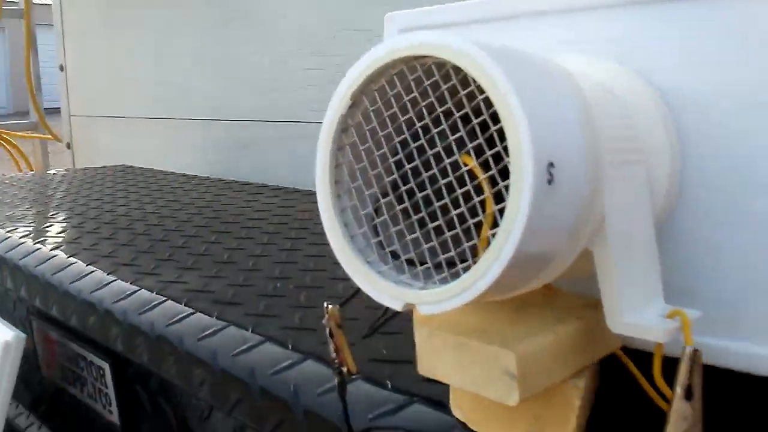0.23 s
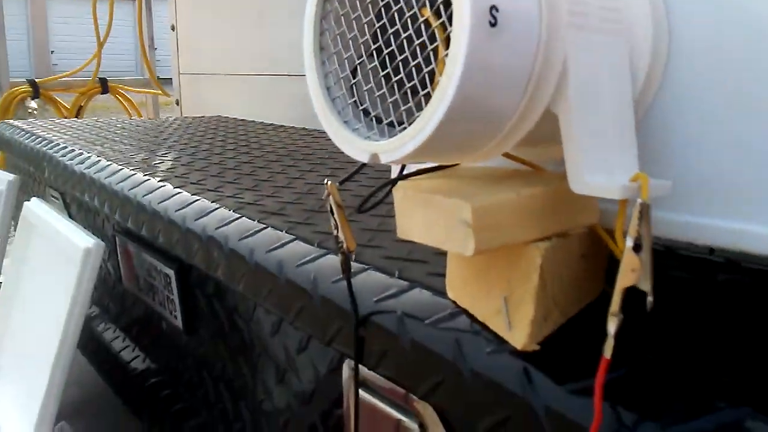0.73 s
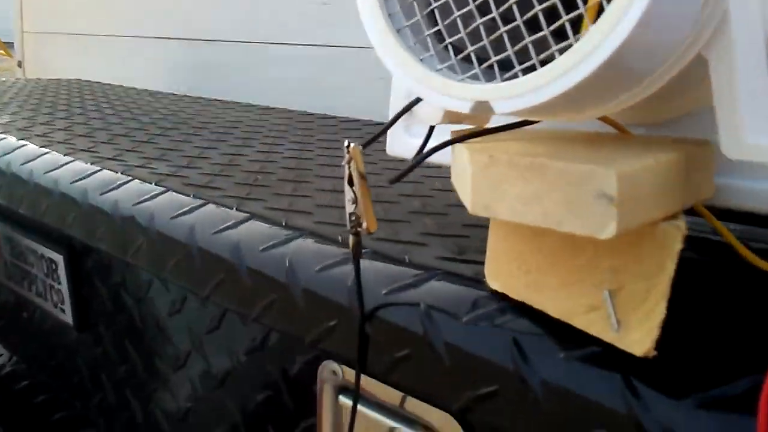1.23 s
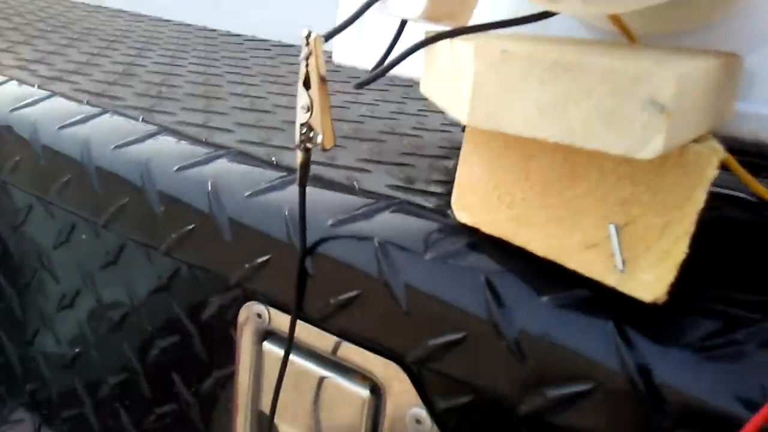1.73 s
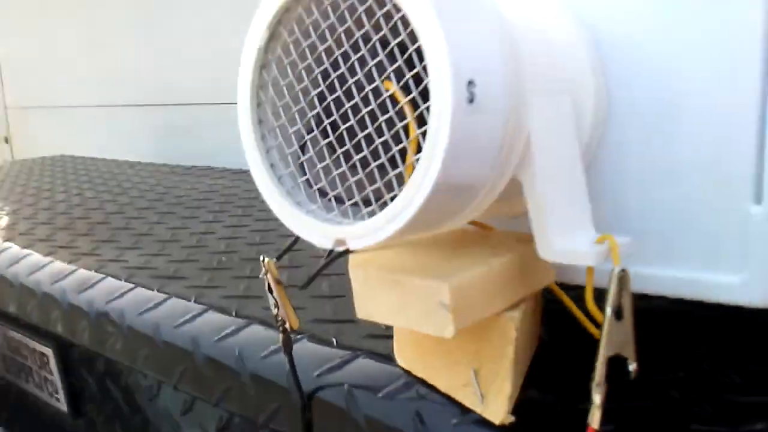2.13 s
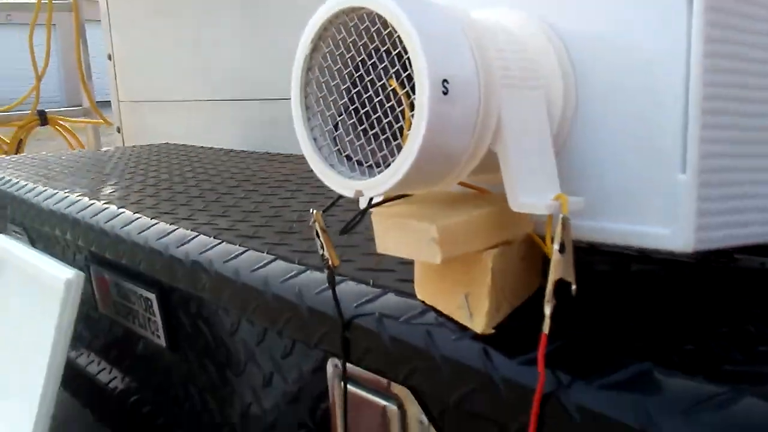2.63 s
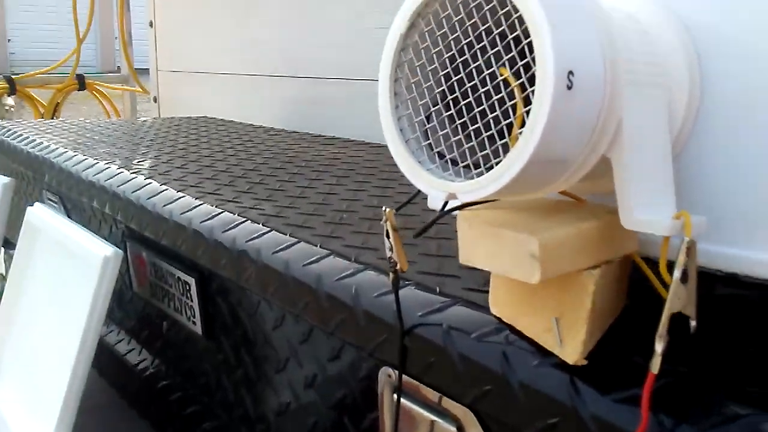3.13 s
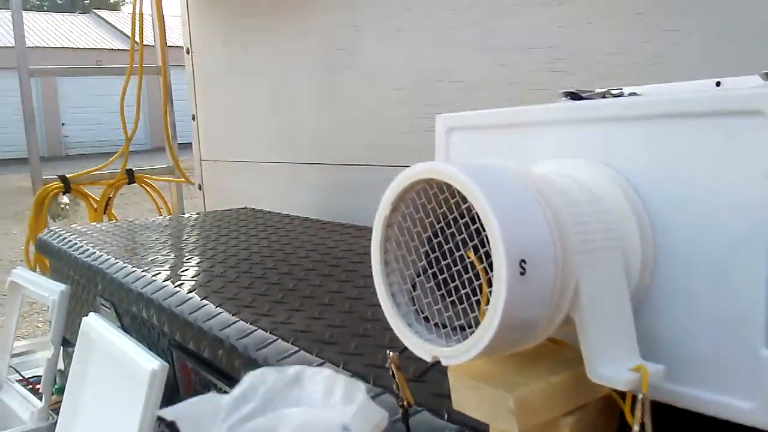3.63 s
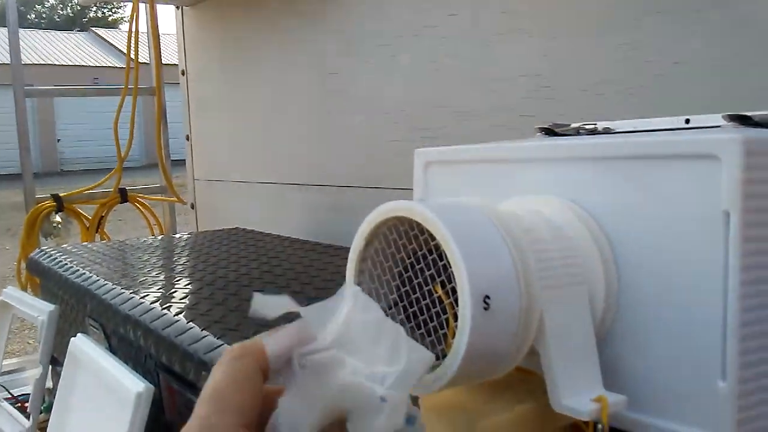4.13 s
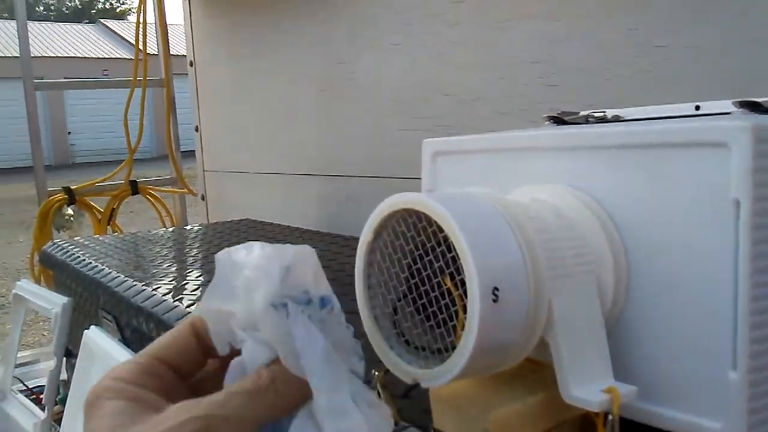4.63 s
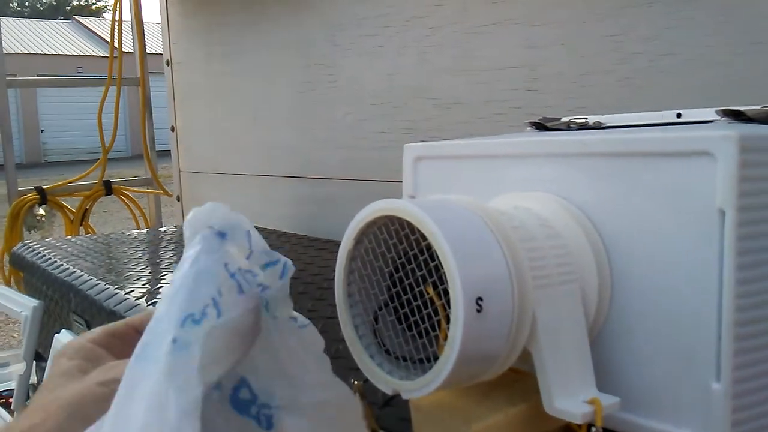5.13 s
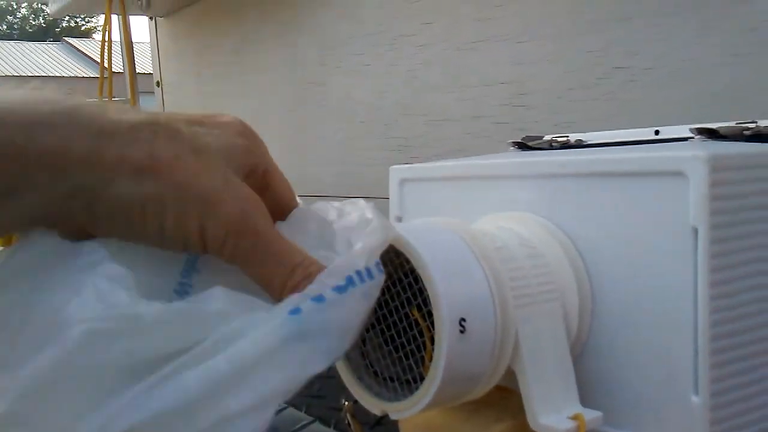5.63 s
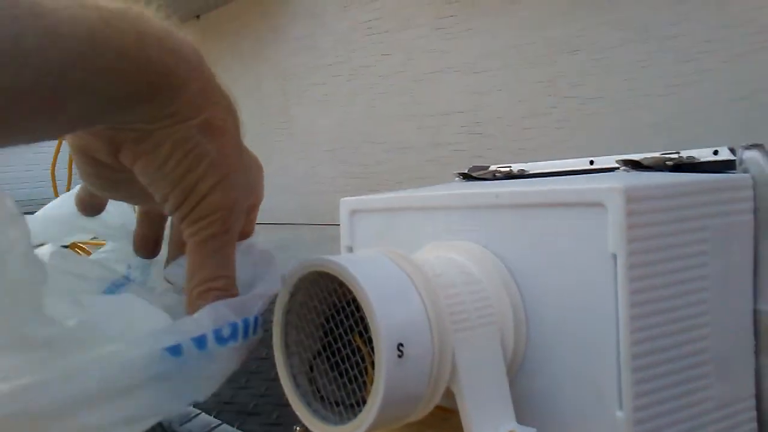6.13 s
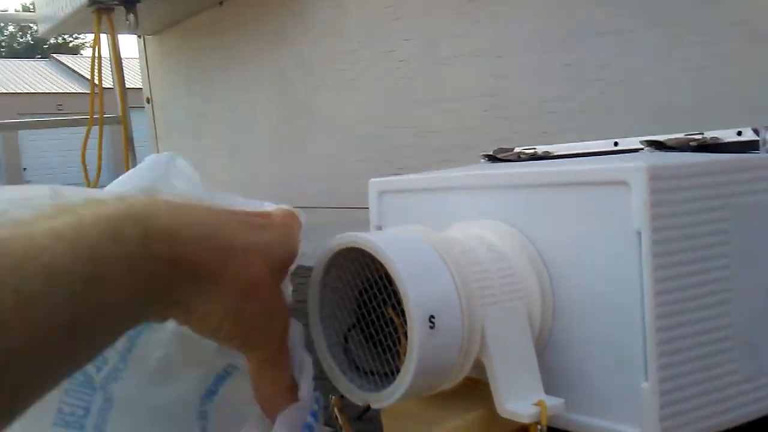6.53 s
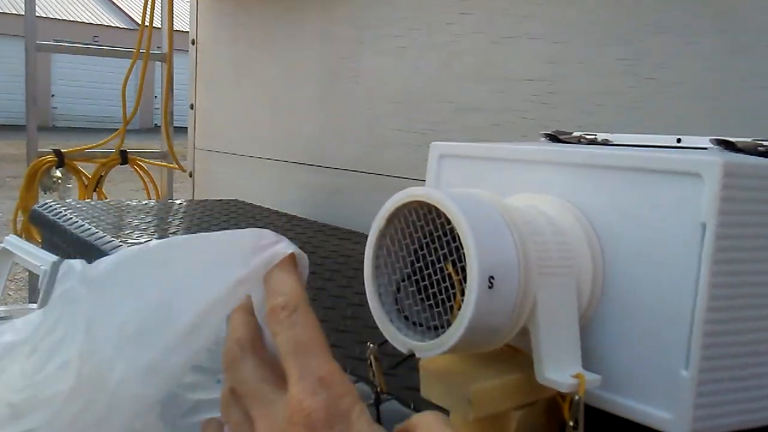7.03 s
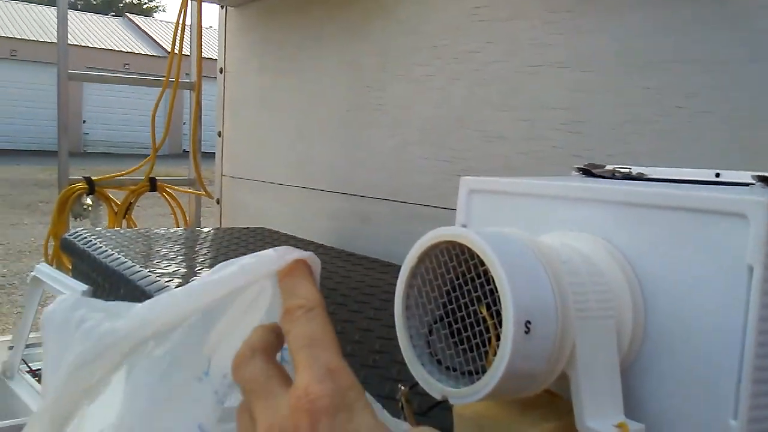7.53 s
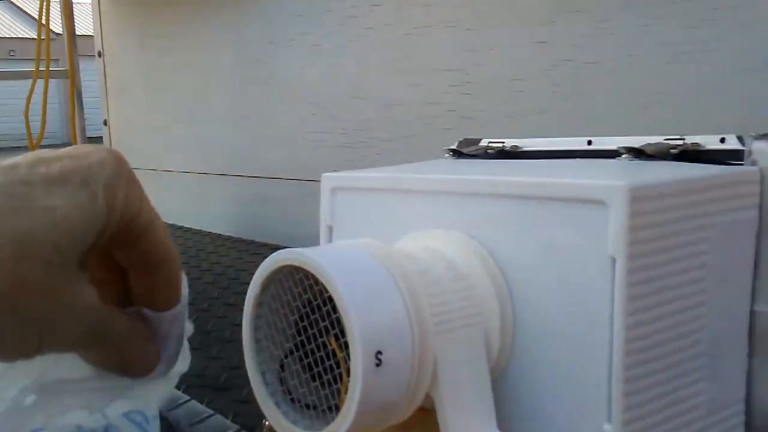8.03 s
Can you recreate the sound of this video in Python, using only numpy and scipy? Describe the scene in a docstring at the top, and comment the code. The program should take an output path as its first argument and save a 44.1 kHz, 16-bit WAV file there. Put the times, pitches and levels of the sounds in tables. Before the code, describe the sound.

Steady high whine, low motor hum and hollow rushing air come from a duct fan at close range. As the microphone wanders past the grille, the tone wavers and the hiss brightens, then dulls. Halfway through, thin film crinkles in sharp little snaps, followed by fluttery low gusts on the microphone and soft rustling to the end, with a barely audible far engine drone underneath.

```python
"""Close in front of a small electric duct fan, a hand-held microphone wanders about the grille.
The steadily running rotor whines on multiples of its shaft rate: sines locked to one count of turns.
Rushing air, made of coloured noise, rings the short housing, roars at its mouth and hisses in the mesh.
A thin plastic bag rustles in the stream as showers of tiny clicks, and gusts bump the microphone.
Far away engines drone on their lowest firing tones."""
import sys
import numpy as np
from scipy import signal
from scipy.fft import rfft, irfft, next_fast_len
from scipy.io import wavfile
from scipy.ndimage import uniform_filter1d

SR = 44100
rng = np.random.default_rng(int(sys.argv[2]) if len(sys.argv) > 2 else 0)


def transcribe(signal):
    """Save signal, clipped to [-1, 1], as a 16-bit WAV file at the path in sys.argv[1]."""
    frames = np.atleast_2d(signal).T
    limited = np.clip(frames, -1, 1)
    pcm = np.round(limited * 32767).astype(np.int16)
    wavfile.write(sys.argv[1], SR, pcm)


N = 366030


def undb(db):
    """Decibels to amplitude gain."""
    return 10 ** (np.asarray(db) / 20)


def unit(x):
    """Scale to rms 1."""
    return x / np.sqrt(np.mean(x ** 2))


def curves(table):
    """The columns of a timed table, drawn as straight lines with one value a sample."""
    s, *columns = np.transpose(table)
    return [np.interp(np.arange(N) / SR, s, c) for c in columns]


def colour(x, points, resonances=()):
    """Filter by an outline of frequency_hz and gain_db, with resonant humps on top."""
    size = next_fast_len(N + SR)
    f = np.maximum(np.arange(size // 2 + 1) * SR / size, 1)
    hz, db = np.transpose(points)
    shape = np.interp(np.log(f), np.log(hz), db)
    for centre, width, lift in resonances:
        shape = shape + lift / (1 + (2 * (f - centre) / width) ** 2)
    return irfft(rfft(x, size) * undb(shape), size)[:N]


def noise(points, resonances=()):
    """Coloured noise of rms 1."""
    return unit(colour(rng.standard_normal(N), points, resonances))


def walk(rate):
    """Smooth chance of rms 1, taking a new direction rate times a second."""
    place = np.arange(N) / SR * rate
    knots = rng.standard_normal(N // 20)
    path = np.interp(place, np.arange(len(knots)), knots)
    return unit(uniform_filter1d(path, int(SR / rate / 2)))


def tone(turns, db):
    """A sine on a running count of cycles, at an rms level and a random phase."""
    return np.sqrt(2) * undb(db) * np.sin(2 * np.pi * (turns + rng.random()))


def puffs(table):
    """Bell-shaped swells at the given times, half-lengths (to 1/e squared) and peak levels."""
    t = np.arange(N) / SR
    return sum(undb(db) * np.exp(-2 * ((t - s) / length) ** 2) for s, length, db in table)


def rotor(rush_db, hiss_db, flutter=0.000504, whine_gain_db=2.15, beat_gains_db=(0, 0, -1),
          wander_db=2.0, shimmer_db=0.68, overtone_shimmer_db=2.14, usual_rush_db=-24.5,
          closeness=0.9, whistle_wander_db=1.0, scatter_db=-45):
    """All lines are locked to one shaft, whose speed flutters by a small share."""
    # pitch of the blade whine: start_s, pitch_hz
    speed = [(0.0, 1917), (1.88, 1915), (2.42, 1914), (2.93, 1911), (3.84, 1917), (4.56, 1921),
             (4.95, 1911), (6.67, 1921), (8.29, 1914)]
    # whine as the microphone crosses its reflections: start_s, level_db before whine_gain_db
    whine = [(0.0, -24.5), (0.16, -22), (0.58, -31), (1.04, -23), (1.27, -25), (1.34, -32), (1.64, -28),
             (1.87, -32), (2.01, -25), (2.36, -25), (2.7, -31.5), (3.03, -24), (3.56, -25), (3.81, -33),
             (4.32, -29.5), (4.6, -37), (4.69, -29), (5.06, -26.5), (5.59, -30.5), (5.89, -44), (6.68, -33),
             (6.84, -25), (7.79, -26.5), (7.93, -38), (8.02, -27), (8.3, -29.5)]
    # overtones of the five-per-turn beat, each with its own sound field:
    # start_s, then order_5_db, order_10_db, order_20_db before beat_gains_db
    beat = [(0.0, -30.5, -39.5, -34), (0.65, -35.5, -31, -46), (1.1, -38.5, -37.5, -33.5),
            (1.95, -30.5, -36, -29), (2.3, -38.5, -34.5, -44), (2.95, -44, -42, -45),
            (3.6, -34.5, -35.5, -34), (4.8, -36, -36, -38), (6.0, -37.5, -34, -35.5),
            (6.6, -38.5, -38, -37), (7.7, -39.5, -38, -32), (8.0, -34, -39, -34), (8.3, -41, -34, -41)]
    # weaker rotor and motor lines: shaft_multiple, level_db at the usual distance
    hum = [(1, -58), (2, -52.5), (3, -36), (6, -45.5), (9, -51), (12, -54), (14, -64), (17, -58), (18, -49),
           (23, -49), (25, -42.5), (28, -47), (29, -60), (30, -50)]
    # faint high lines that ride on the hiss: shaft_multiple, level_db against hiss_db
    sing = [(35, -14), (50, -31), (70, -27)]
    # thin whistles beaming out of the grille:
    # shaft_multiple, level_db on the axis, beaming in dB per dB of hiss
    whistles = [(40, -36, 3.5), (55, -39.5, 1.5)]
    whine_order, on_axis_hiss_db = 15, -31.5

    whine_hz, = curves(speed)
    shaft_hz = whine_hz / whine_order * (1 + flutter * walk(25.1))
    turns = np.cumsum(shaft_hz) / SR
    whine_level_db = curves(whine)[0] + whine_gain_db + shimmer_db * walk(50)
    out = tone(whine_order * turns, whine_level_db)
    # eddies scatter a little of the whine, so it wavers where it is weak
    out += tone(whine_order * turns, scatter_db) * walk(30)
    for order, db, gain_db in zip((5, 10, 20), curves(beat), beat_gains_db):
        out += tone(order * turns, db + gain_db + overtone_shimmer_db * walk(20))
    # the hum grows with the rush as the microphone comes close
    near_db = closeness * (uniform_filter1d(rush_db, SR) - usual_rush_db)
    for order, db in hum:
        # shorter waves change more as the microphone moves
        order_wander_db = wander_db * min(order / whine_order, 1)
        out += tone(round(order) * turns, db + near_db + order_wander_db * walk(4))
    for order, db in sing:
        out += tone(round(order) * turns, hiss_db + db + wander_db * walk(3))
    # narrow beams: off the axis the whistles fade faster than the hiss
    for order, db, beaming in whistles:
        beam_db = db + beaming * (hiss_db - on_axis_hiss_db)
        out += tone(round(order) * turns, beam_db + whistle_wander_db * walk(8.8))
    return out


def airflow(rush_db, mouth_db, hiss_db, rush_gain_db=1, mouth_gain_db=-.5, hiss_gain_db=1.5,
            eddy_db=0.67, core_gain_db=11, beaming=1.59, core_share=0.3, usual_mouth_db=-28):
    """Turbulence rings the housing, roars at its mouth and hisses in the mesh, shaken by eddies."""
    # spectral outlines, from the housing to the bright core of the hiss:
    # frequency_hz, relative_density_db
    rush_outline = [(30, -26), (65, -13), (120, -23.5), (170, -6.5), (280, -5), (550, -1.5), (900, -2),
                    (1400, -2.5), (1750, 1.5), (2050, 4.5), (2600, 3), (3200, 4), (4000, -0.5), (6000, -45)]
    mouth_outline = [(1000, -26), (2800, -18.5), (3350, -8), (3600, 3.5), (3850, 3), (4020, 3.5),
                     (4800, -15), (6500, -39)]
    hiss_outline = [(3000, -27), (4500, 2), (6400, -0.5), (7200, -0.5), (8200, -2), (9100, -13),
                    (10000, -13.5), (11000, -21.5), (12500, -30), (15700, -36)]
    core_outline = [(6500, -29), (8100, 2), (9200, 0.5), (10200, -26), (12000, -42)]
    # air resonances of the housing: centre_hz, width_hz, lift_db
    duct = [(1063, 70, 5), (1128, 145, 9.5), (1540, 64, 1), (2170, 81, 9.5), (2294, 78, 5.5),
            (2814, 105, 5.5)]

    rush = noise(rush_outline, duct) * undb(rush_db + rush_gain_db + eddy_db * walk(20))
    mouth = noise(mouth_outline) * undb(mouth_db + mouth_gain_db + eddy_db * walk(50))
    hiss = noise(hiss_outline) * undb(hiss_db + hiss_gain_db + eddy_db * walk(40))
    # the core is a narrow beam, so it falls away faster off the axis
    # and it grows with the roar as the microphone faces the mouth
    facing_mouth_db = core_share * (mouth_db - usual_mouth_db)
    core = noise(core_outline) * undb(beaming * hiss_db + core_gain_db + facing_mouth_db)
    return rush + mouth + hiss + core


def bag(grains_per_s=12000, spread_db=3.5, flap_db=2.0, bag_gain_db=5.5,
        crease_decay_s=0.0034, crease_gain_db=6):
    """Countless tiny buckles of film; sharp creases add short, differently coloured showers of them."""
    # sharp creases snapping: peak_s, level_db before crease_gain_db
    creases = [(3.739, -50), (3.764, -47), (3.789, -50), (3.815, -47), (3.912, -43), (3.934, -39),
               (3.952, -39), (3.995, -46), (4.04, -47), (4.081, -48), (7.39, -47)]
    # the bag lifted in front of the microphone: start_s, sizzle level_db against the crinkle
    facing = [(3.55, -18), (3.76, -3), (7.5, 0), (7.62, -14), (7.8, 0), (8.3, -9)]
    # outlines of film crinkle, its finest crackle and a snapping crease:
    # frequency_hz, relative_density_db
    film = [(2000, -20), (6500, 12), (8500, 11), (10000, 3.5), (12000, 1), (13200, -1), (14500, -1.5),
            (15700, -3.5)]
    sizzle = [(9000, -28), (12000, -15), (13300, -3), (14600, 2), (15700, 3)]
    snap = [(3000, -10), (7500, 7), (10000, -10), (12000, -15), (14000, 0), (15700, 1)]

    sizes = undb(spread_db * np.minimum(rng.exponential(size=N), 5)) * rng.choice([-1, 1], N)
    buckles = sizes * (rng.random(N) < grains_per_s / SR)
    effort = handling() * undb(bag_gain_db + flap_db * walk(90))
    t = np.arange(N) / SR
    showers = sum(undb(db + crease_gain_db) * np.exp(-np.abs(t - s) / crease_decay_s)
                  for s, db in creases)
    crackle = unit(colour(buckles, sizzle)) * undb(curves(facing)[0])
    crinkle = unit(colour(buckles, film)) + crackle
    return crinkle * effort + unit(colour(buckles, snap)) * showers


def handling():
    """As fingers shift their grip, each rustle swells and dies more slowly, over a faint constant stirring."""
    # peak_s, half_length_s before the rise and fall shares, level_db before the bag's gain
    rustles = [(1.77, .15, -49), (2.05, .05, -45), (2.3, 0.15, -45), (2.647, 0.14, -45), (3.07, 0.075, -45),
               (3.2, .05, -51), (3.38, .1, -47), (3.79, .08, -56), (3.99, .11, -51), (4.3, 0.074, -65),
               (4.68, 0.078, -52), (4.9, 0.22, -59), (5.22, .17, -52.5), (5.47, 0.13, -51),
               (5.83, 0.2, -56), (6.52, 0.16, -60), (7.4, .04, -54), (7.817, .08, -55), (8.08, 0.19, -50),
               (8.26, 0.1, -40.5)]
    rise_share, fall_share = 1, 1.4
    t = np.arange(N) / SR
    # the film stirs in the stream between rustles
    power = undb(-63.5) ** 2
    for s, length, db in rustles:
        width = length * np.where(t < s, rise_share, fall_share)
        power = power + (undb(db) * np.exp(-2 * ((t - s) / width) ** 2)) ** 2
    return np.sqrt(power)


def gusts():
    """Air turned aside by the bag thumps on the microphone; the moving hand adds deeper bumps."""
    # gusts, then soft bumps of the hand holding the microphone: peak_s, half_length_s, level_db
    gust_times = [(4.746, .015, -24.5), (4.775, .015, -30), (4.803, 0.013, -26), (4.828, .01, -30),
                  (4.995, 0.04, -33), (5.22, .08, -37.5), (5.312, 0.012, -28.5), (5.356, 0.019, -23),
                  (5.395, 0.029, -26), (5.422, 0.011, -28), (5.48, .07, -40), (5.542, 0.019, -27),
                  (6.575, .04, -37)]
    bump_times = [(.16, .08, -47), (.79, .04, -46), (4.74, .04, -43), (5.5, 0.098, -36), (6.97, .06, -49.5),
                  (7.1, .04, -48), (7.79, .05, -46)]
    # their outlines: frequency_hz, relative_density_db
    buffet = [(25, -34), (65, -2), (120, -13.5), (170, 4), (260, 6), (380, -1), (600, -14), (1500, -45)]
    bump = [(25, -30), (55, 1), (80, -1), (140, -20), (400, -49)]
    return noise(buffet) * puffs(gust_times) + noise(bump) * puffs(bump_times)


def far_engines(firing_db=-58, harmonic_db=-44.0, partner_db=-48.5, waver_db=1):
    """Only the lowest firing tones carry this far; two hums almost in step beat against each other."""
    # a far engine under even load, carried unevenly by the wind: start_s, firing_hz, swell_db
    drone_course = [(0, 106.1, -6), (1.3, 105.4, -0.5), (2.5, 106.9, 0.5), (3.2, 107.8, 4.5),
                    (4.2, 109, -3.5), (5.6, 107.8, 3), (6.3, 106.8, -3), (7.1, 101, -0.5), (8.3, 104.2, -1)]
    # a far vehicle gathering speed: start_s, firing_hz, level_db
    traffic = [(0, 62, -75), (3.2, 63, -74), (3.5, 62, -52), (4.4, 61, -55), (4.9, 67, -50), (5.5, 72, -43),
               (5.68, 75, -54), (6.2, 77, -51.5), (7.4, 81, -68), (7.9, 82, -51.5), (8.3, 76, -54)]
    throb_start_hz, throb_slowing_hz_per_s = 1.62, .035

    t = np.arange(N) / SR
    firing_hz, swell_db = curves(drone_course)
    turns = np.cumsum(firing_hz) / SR
    # a second hum runs just above the engine's second harmonic, so the two throb
    lead = np.cumsum(throb_start_hz - throb_slowing_hz_per_s * t) / SR
    harmonic = undb(harmonic_db) * np.sin(2 * np.pi * 2 * turns)
    partner = undb(partner_db) * np.sin(2 * np.pi * (2 * turns + lead))
    hums = tone(turns, firing_db) + np.sqrt(2) * (harmonic + partner)
    drone = hums * undb(swell_db + waver_db * walk(3.05))
    vehicle_hz, vehicle_db = curves(traffic)
    return drone + tone(np.cumsum(vehicle_hz) / SR, vehicle_db + 2.1 * walk(8.6))


def scene(sway_db=1.3):
    """Fan, bag and background add up at one microphone, whose place sets the levels of the air."""
    # air, louder as the microphone nears the duct: start_s, rush_db, mouth_db before airflow's gains
    air = [(0.0, -22.5, -26), (0.6, -24.5, -31.5), (1.2, -23, -27), (1.62, -21, -18.5),
           (1.95, -21.5, -24.5), (2.4, -25.5, -29), (3.1, -25, -28.5), (4.0, -25, -32), (5.1, -25, -31.5),
           (6.2, -25.5, -31), (7.1, -26, -32.5), (7.9, -25.5, -32.5), (8.3, -24.5, -26.5)]
    # hiss, strongest on the fan's axis and shaded by the hand: start_s, level_db before airflow's gain
    grille = [(0.0, -33), (0.7, -36), (1.62, -29), (2.03, -31), (2.48, -40), (2.66, -37.5), (2.92, -41.5),
              (3.35, -38.5), (3.6, -44.5), (4.4, -47), (5.3, -43), (5.95, -46), (6.14, -55), (6.3, -46.5),
              (6.52, -53.5), (6.93, -50), (7.06, -43), (7.4, -41.5), (7.63, -49.5), (8.3, -42)]
    rush_db, mouth_db = curves(air)
    hiss_db = curves(grille)[0] + sway_db * walk(8)
    fan = rotor(rush_db, hiss_db) + airflow(rush_db, mouth_db, hiss_db)
    return (fan + bag() + gusts() + far_engines())[None]


def record(dry):
    """The microphone port cuts the bass and a deep notch, and the recorder ends the treble."""
    # response of the port: frequency_hz, gain_db
    port = [(28, -12), (55, -1.5), (4020, 0.5), (4130, -10), (4240, -13), (4400, -27.5), (4780, -31.5),
            (5150, -15), (5500, -13), (5900, -4), (6300, 0.5)]
    top_hz = 15750
    heard = colour(dry[0], port)[None]
    treble_cut = signal.ellip(12, .1, 80, top_hz, fs=SR, output="sos")
    return signal.sosfilt(treble_cut, heard)


dry = scene()
out = record(dry)
transcribe(out)
```